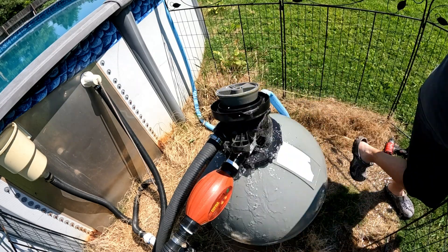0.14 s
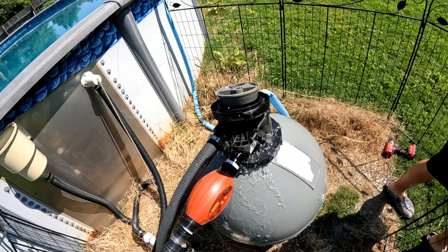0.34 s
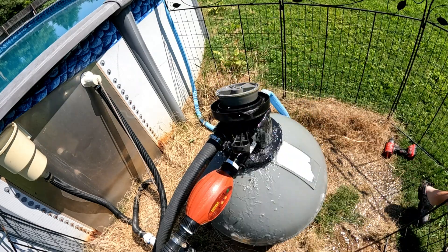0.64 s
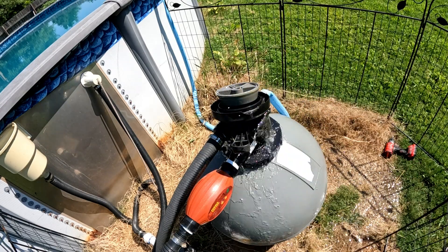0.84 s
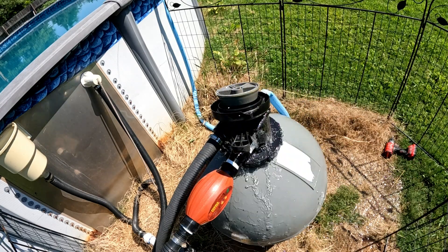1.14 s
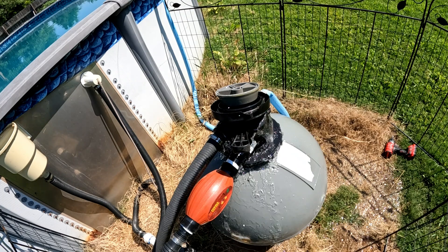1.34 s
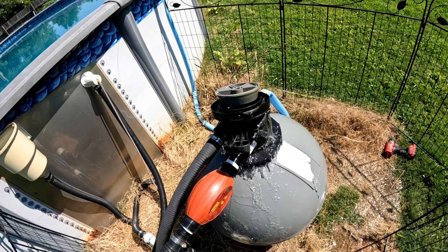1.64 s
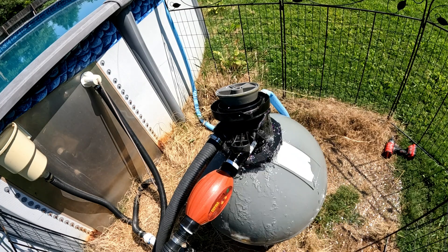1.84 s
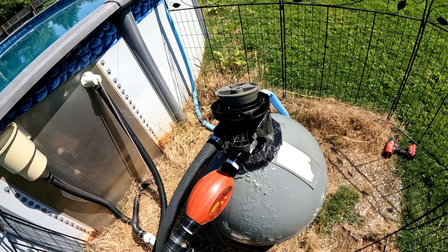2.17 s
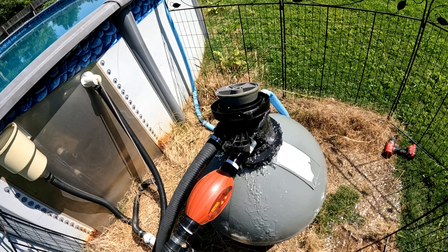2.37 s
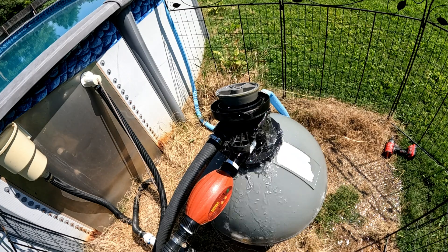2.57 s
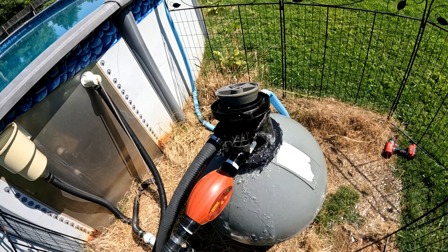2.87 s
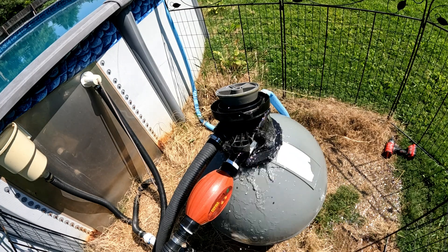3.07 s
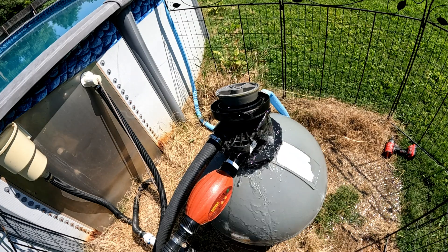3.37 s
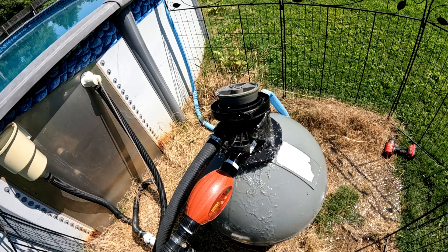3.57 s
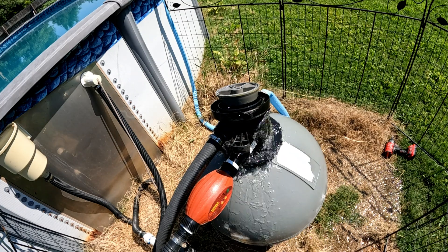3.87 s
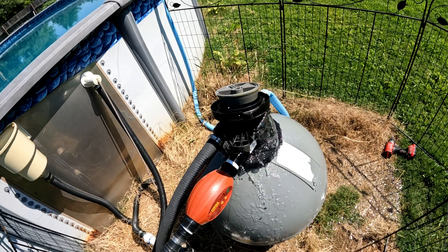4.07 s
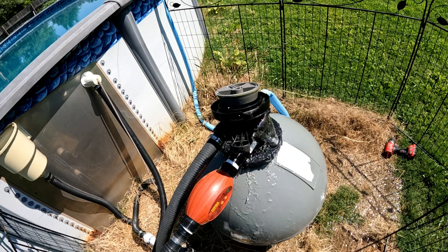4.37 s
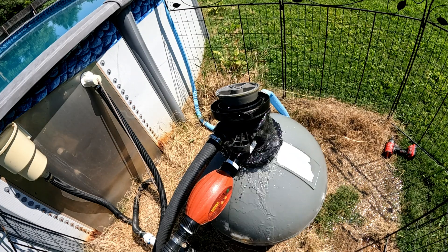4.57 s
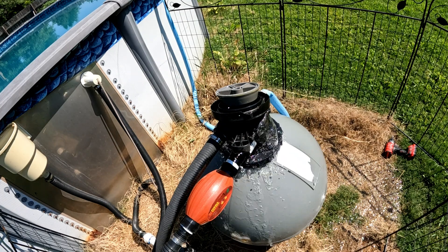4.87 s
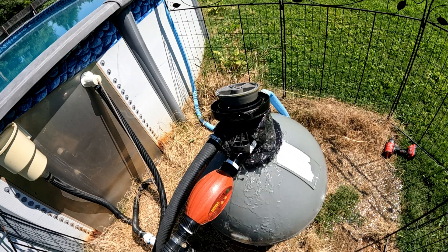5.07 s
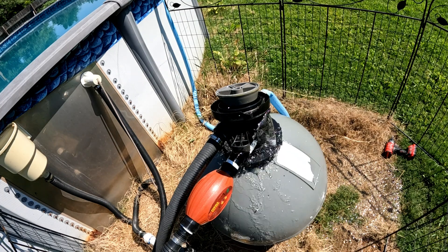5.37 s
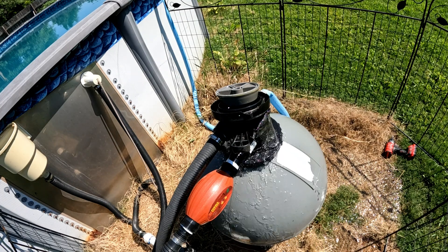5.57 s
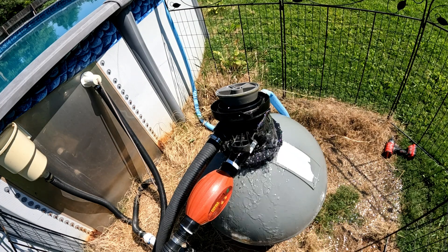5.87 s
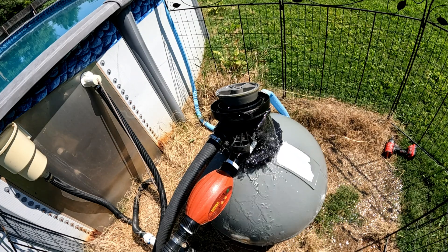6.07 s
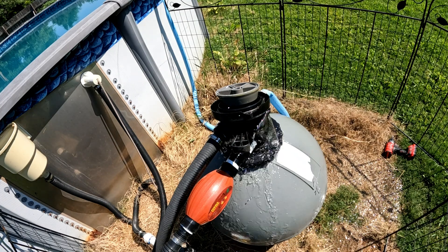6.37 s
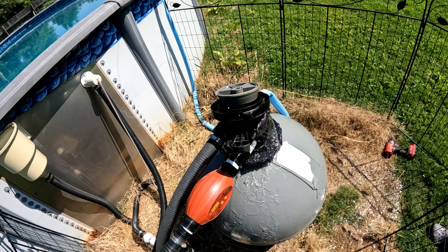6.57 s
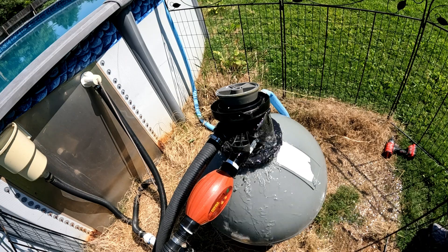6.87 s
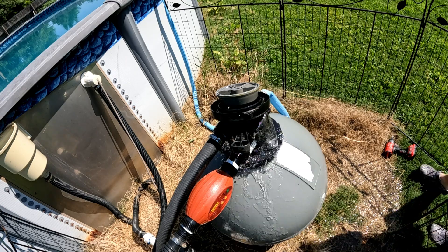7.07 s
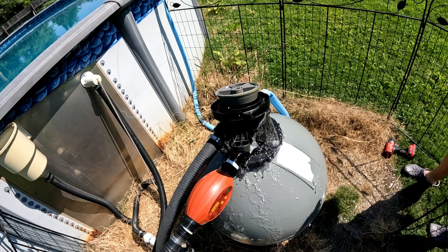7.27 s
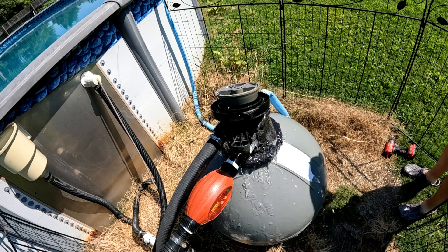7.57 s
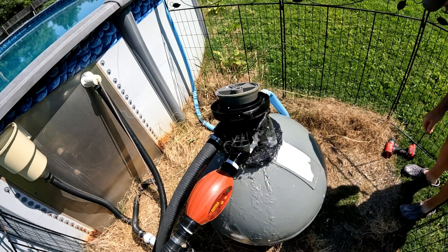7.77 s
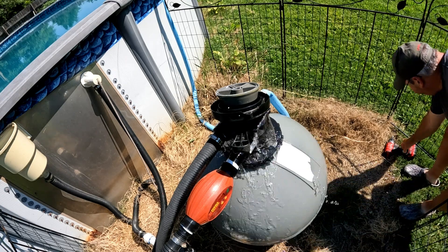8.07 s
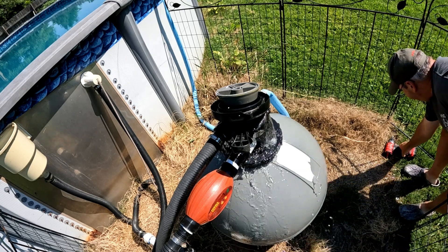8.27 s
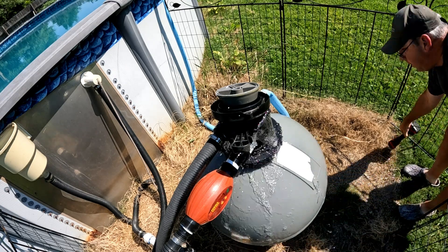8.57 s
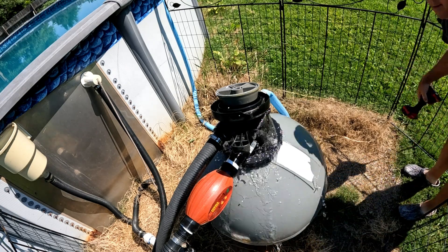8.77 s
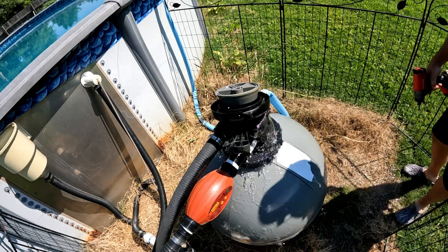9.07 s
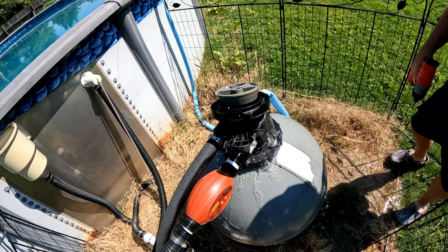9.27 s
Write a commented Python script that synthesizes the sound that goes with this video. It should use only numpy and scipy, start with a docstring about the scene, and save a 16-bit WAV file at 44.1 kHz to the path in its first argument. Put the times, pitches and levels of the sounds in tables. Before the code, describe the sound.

Bright bubbling trickle and ticking drops running off a pool tank, with a few brief wet squeaks and low wind buffets.

```python
"""Throughout, water wells out of the open valve of a pool filter, runs down the tank and splashes on the ground:
spurting swarms of ringing bubbles and ticking drops, over noise, outdoors in a light breeze with a far rush.
Faint hum swells in and out until 5.9 s; wet gliding squeaks stand out at 0.7, 1.4 and 2.3-2.6 s.
Gusts of rumbling noise buffet the microphone hard with single thuds at 2.3-2.9 s and 3.8-4.3 s.
The valve's hollow rings, as a resonance of the stream, from 4.6 to 7.5 s; soft footfalls of noise at 7.2-7.8 s."""
import sys
import numpy as np
from scipy import signal
from scipy.fft import rfft, irfft, next_fast_len
from scipy.io import wavfile
from scipy.ndimage import uniform_filter1d

SR = 44100
rng = np.random.default_rng(int(sys.argv[2]) if len(sys.argv) > 2 else 0)


def transcribe(signal):
    """Save signal, clipped to [-1, 1], as a 16-bit WAV file at the path in sys.argv[1]."""
    frames = np.atleast_2d(signal).T
    limited = np.clip(frames, -1, 1)
    pcm = np.round(limited * 32767).astype(np.int16)
    wavfile.write(sys.argv[1], SR, pcm)


N = 415863
T = np.arange(N) / SR


def amp(db):
    """Decibels to gain."""
    return 10 ** (np.asarray(db) / 20)


def unit(x):
    """Scales to an rms of one."""
    return x / np.sqrt(np.mean(x ** 2) + 1e-20)


def read(points, hz):
    """Reads a spectrum on a log-frequency axis."""
    f, value = np.transpose(points)
    return np.interp(np.log(hz + 1), np.log(f), value)


def curve(rows):
    """Interpolates a table of (t/s, level/dB) at every sample."""
    t, level_db = np.transpose(rows)
    return np.interp(T, t, level_db)


def colour(x, points):
    """Multiplies a sound's spectrum by a curve, then scales to an rms of one."""
    size = next_fast_len(N + 4096)
    gain = amp(read(points, np.fft.rfftfreq(size, 1 / SR)))
    return unit(irfft(rfft(x, size) * gain, size)[..., :N])


def add(mix, s, sound):
    """Adds a sound into the mix at a time."""
    part = mix[..., max(round(s * SR), 0):][..., :sound.shape[-1]]
    part += sound[..., :part.shape[-1]]


def wander(per_s):
    """A random curve that takes per_s new values a second."""
    knots = rng.standard_normal(4096)
    return unit(np.interp(T * per_s, np.arange(len(knots)), knots))


def pair(likeness):
    """Two white noises that are partly alike."""
    a, b = rng.standard_normal((2, N))
    c = np.clip(likeness, 0, 1)
    return np.array([a, c * a + np.sqrt(1 - c * c) * b])


def swells(rows):
    """Soft-edged bursts of gain from rows of (t/s, length/s, level/dB)."""
    level = np.zeros(N)
    for s, length_s, db in rows:
        add(level, s, amp(db) * np.hanning(int(length_s * SR)))
    return level


# relative spectra of gurgle and spatter: f/Hz, level/dB
GURGLE_COLOUR = [(300, -20), (600, -13), (830, -6.5), (1100, 0.5), (1450, -0.5), (1660, 2), (1900, -2),
                 (2400, 2.5), (3500, -18)]
SPATTER_COLOUR = [(600, -20), (1500, -0.5), (2300, -4), (2950, 2), (3500, -1.5), (5000, -5), (6500, -7),
                  (7700, -12), (8800, -20), (9900, -14), (12500, -25), (14500, -53), (15800, -81)]


def stream(gurgle_db=-5, spatter_db=-1):
    """The overflow arrives in quick, uneven spurts that drive gurgle, spatter and a fine wash together."""
    spurt_db = 0.85 * spurts(per_s=30) + 0.7 * spurts(per_s=140)
    churn_db = 1.3 * spurts(per_s=45)  # trapped air leaves the valve in clumps
    gurgle = swarm(2 * (spurt_db + churn_db), per_s=1150, low_hz=370.6, high_hz=3407, cycles=5.1,
                   spread_db=2.0, width=0.45, size_limit=3.6, top_rise=0.09)
    gurgle = colour(gurgle + amp(-2.0) * pair(1.0), GURGLE_COLOUR)

    spatter = swarm(spurt_db, per_s=2100, low_hz=1501, high_hz=14070, cycles=5.34,
                    spread_db=2.5, width=0.49, size_limit=3.8, top_rise=0.047)
    spatter += amp(0.5) * impacts(spurt_db, per_s=420, spread_db=2.5, ring_s=0.0012)
    spatter += amp(-2.5) * pair(0.94)
    # the finest spray reaches each port on its own
    spray = colour(pair(0), [(4000, -15), (11500, -3), (13500, -4.5), (15500, -42)])
    spatter = colour(spatter, SPATTER_COLOUR) + amp(-21.5) * spray
    spatter = unit(spatter * amp(1.28 * spurt_db + 0.6 * wander(per_s=16)))

    water = amp(gurgle_db) * unit(gurgle) + amp(spatter_db) * spatter
    return water * amp(flow_db())


# the stream eases a little: t/s, level/dB
STRENGTH = [(0, -38), (3.1, -39.5), (5.4, -40), (7.9, -39.5), (9.4, -39.5)]
# surges and lulls of water over the rim: t/s (middle), level/dB (re stream)
SURGES = [(1.04, -3), (1.2, 2), (2.09, 0.5), (3.46, -2), (3.56, 2), (4.645, 3), (4.81, 1.7), (4.96, -1),
          (6.13, 1), (6.33, 2.5), (7.56, 3), (8.25, 4), (8.79, 0.5)]
SURGE_S = 0.049  # half width, to 1/e of the dB change


def flow_db():
    """Level of the stream: nearly steady, with short rounded surges and lulls."""
    surge_db = sum(db * np.exp(-((T - s) / SURGE_S) ** 2) for s, db in SURGES)
    return curve(STRENGTH) + surge_db


def spurts(per_s):
    """Quick random ups and downs that cancel out, so that the mean level in dB holds."""
    knots = np.diff(rng.random(4096) ** 2)
    return unit(np.interp(T * per_s, np.arange(len(knots)), knots))


def swarm(spurt_db, per_s, low_hz, high_hz, cycles, spread_db, width, size_limit, top_rise,
          link_s=0.0045, step=0.2, count=3):
    """Air breaks into short chains of bubbles, each soon after the last and near its pitch, thicker in spurts."""
    odds = np.cumsum(amp(spurt_db))
    out = np.zeros((2, N))
    chains = int(per_s * N / SR / count)
    for chain in rng.random((8000, count + 1, 5))[:chains]:
        when, pitch, size, side, _ = chain[0]
        s = np.searchsorted(odds, when * odds[-1]) / SR
        hz = low_hz * (high_hz / low_hz) ** pitch
        gain = amp(spread_db * min(-np.log(1 - size), size_limit)) * hz  # pitch weight keeps the swarm white
        pan = width * (2 * side - 1)
        for share, ring, glide, wait, leap in chain[1:]:
            ring_cycles = cycles * 2 ** (2 * ring - 1)
            sound = gain * share * bubble(hz, ring_cycles, rise=top_rise * glide ** 2)
            add(out, s, np.array([[1 + pan], [1 - pan]]) * sound)
            s += 2 * link_s * wait
            hz = min(hz * (1 + step * (2 * leap - 1)), high_hz)
    return unit(out)


def bubble(hz, cycles, rise):
    """A pocket of air swells into ringing and dies, its pitch rising as it nears the surface; envelope peak 1."""
    u = np.arange(int(4 * cycles * SR / hz)) * hz / (cycles * SR)  # time in ring lengths
    envelope = 2 * u * np.exp(1 - 2 * u)
    turns = cycles * (u + rise * (u * u / 2 - u * np.log(2)))
    return envelope * np.sin(2 * np.pi * turns)


def impacts(spurt_db, per_s, spread_db, ring_s, width=0.25):
    """Droplets tick on the tank and the ground, each a short dying burst of noise."""
    sizes = amp(spread_db * np.minimum(rng.exponential(1, N), 5))
    hits = sizes * (rng.random(N) < per_s * amp(spurt_db) / SR)
    spot = rng.integers(0, 2048, N)
    t = T[:256]
    rings = rng.standard_normal((2048, 2, len(t))) * np.exp(-t / ring_s)
    out = np.zeros((2, N))
    for at in np.flatnonzero(hits):
        common, apart = rings[spot[at]]
        add(out, at / SR, hits[at] * (common + np.array([[width], [-width]]) * apart))
    return unit(np.diff(out, prepend=0) + .5 * out)  # treble lift


# loudest bubbles, deep glugs to high plinks: t/s, level/dB (peak), f/Hz, ring/cycles
BUBBLES = [(0.055, -21.5, 4030, 7.5), (0.2117, -19, 3680, 2.6), (0.543, -28.5, 4260, 8.1),
           (0.651, -35.5, 527, 4), (0.671, -23.5, 3670, 6.3), (1.129, -19, 3170, 7.2),
           (1.159, -18, 2350, 6.2), (1.2032, -22, 5700, 6.8), (1.5291, -21.5, 6600, 4.9),
           (1.566, -28.5, 1430, 5), (1.579, -19.5, 2060, 3.2), (1.657, -22.5, 2820, 4.5),
           (1.766, -39, 766, 2.5), (2.045, -28.5, 1570, 5.6), (2.094, -21.5, 3780, 7.3),
           (2.16, -40.5, 700, 7), (2.304, -25.5, 2560, 5.6), (2.6284, -20.5, 3150, 6),
           (2.782, -26, 2700, 8.7), (2.946, -27.5, 4600, 9.7), (2.967, -24.5, 4600, 8.3),
           (3.266, -22, 2480, 4), (3.4014, -22, 2260, 3.9), (3.5306, -20, 1870, 3),
           (3.8404, -21.5, 2270, 2.1), (3.842, -26.5, 7400, 9), (4.2664, -11.5, 5830, 3),
           (4.2651, -20, 2990, 6.2), (4.586, -21, 5760, 6.7), (4.6038, -21, 2900, 4.8),
           (4.765, -28, 3190, 7), (4.941, -34.5, 1610, 8), (5.029, -39, 1580, 17), (5.077, -32, 1480, 6),
           (5.194, -22.5, 3120, 3), (5.649, -23, 1940, 2.7), (5.684, -23, 2860, 3.3),
           (6.103, -30, 1700, 4.5), (6.1198, -22, 2300, 3.4), (6.161, -30, 1370, 4.6),
           (6.233, -24, 3270, 3.6), (6.318, -19, 3360, 1.9), (6.566, -22.5, 2860, 4.6),
           (6.66, -39, 750, 4.2), (6.8092, -21.5, 2940, 4.1), (7.148, -26, 2160, 4.8),
           (7.311, -19, 3000, 2.4), (7.739, -19, 2780, 1.1), (7.807, -31, 1810, 15),
           (7.8702, -16.5, 2720, 1.5), (7.92, -21, 4330, 5.9), (7.949, -28.5, 1660, 12),
           (8.127, -23.5, 2790, 8.5), (8.208, -22.5, 6060, 3.8), (8.244, -27, 1540, 3),
           (8.3797, -27, 3900, 15), (9.0257, -20, 1570, 2.3)]
# dull slaps, splats and cracks: t/s, level/dB (peak), f/Hz (mid band), decay/s
SPLATS = [(1.283, -31, 520, 0.0065), (1.295, -26.5, 800, 0.01), (1.317, -29, 600, 0.006),
          (1.361, -17.5, 2400, 0.0026), (2.07, -31, 1310, 0.004), (2.65, -22, 900, 0.0053),
          (2.813, -27.5, 2000, 0.0031), (4.077, -33, 696, 0.022)]
# drops ticking sharply on the tank: t/s, level/dB (peak), f/Hz (mid band)
TICKS = [(0.134, -22, 5200), (0.474, -29, 6200), (0.627, -19.5, 9500), (2.427, -20.5, 3700),
         (2.8, -29.5, 6700), (3.519, -20, 3600), (4.266, -20, 6000), (4.848, -30, 4300),
         (5.225, -25.5, 5500), (5.37, -19.5, 6400), (5.884, -20, 10500), (6.351, -25, 6000),
         (6.531, -20, 3500), (7.735, -19.5, 4000), (8.975, -31.5, 6300), (9.376, -20, 3900)]
TICK_DECAY_S = 0.0024


def plinks():
    """The large bubbles, slaps and ticks that stand out from the stream."""
    out = np.zeros(N)
    for s, db, hz, cycles in BUBBLES:
        add(out, s, amp(db) * bubble(hz, cycles, rise=0.048))
    for s, db, hz, decay_s in SPLATS:
        add(out, s, amp(db) * slap(hz, decay_s))
    for s, db, hz in TICKS:
        add(out, s, amp(db) * slap(hz, TICK_DECAY_S))
    return out


def slap(hz, decay_s):
    """A short hit: a quickly dying patter of fine pulses, with a peak of one."""
    t = T[:2048]
    patter = rng.standard_normal(len(t)) * np.sqrt(rng.exponential(1, len(t)))
    edges_hz = [hz / 2.1, min(hz * 1.54, SR / 2 - 1)]
    band = signal.butter(2, edges_hz, "band", fs=SR, output="sos")
    sound = signal.sosfilt(band, patter * np.exp(-t / decay_s))
    sound = uniform_filter1d(sound, size=3)  # water cushions the very top
    return sound / abs(sound).max()


# upward-sweeping bubble: t/s, length/s, level/dB (start), f/Hz (start), rise/share of f
CHIRPS = [(4.747, 0.032, -38.5, 744, 1.12)]


def chirps(attack_s=0.0018, fade_db=-5):
    """A bubble nearly holds its pitch, then sweeps upward as it breaks the surface."""
    out = np.zeros(N)
    for s, length_s, db, hz, rise in CHIRPS:
        u = np.linspace(0, 1, int(length_s * SR))
        edges = np.minimum(np.minimum(u, 1 - u) * length_s / attack_s, 1)
        phase = 2 * np.pi * np.cumsum(hz * (1 + rise * u ** 3)) / SR
        add(out, s, edges * amp(db + fade_db * u) * np.sin(phase))
    return out


# hollow of the valve rings: t/s, length/s, level/dB (resonance gain at the crest)
HOLLOW = [(4.64, 2.9, -14)]


def hollow(water, ring_hz=1640, width_hz=130):
    """The water sets the hollow of the open valve ringing for a while: a resonant filter on the stream."""
    peak = signal.iirpeak(ring_hz, ring_hz / width_hz, fs=SR)
    return water + swells(HOLLOW) * signal.lfilter(*peak, water)


# wet squeaks: t/s, length/s, level/dB (fundamental), f/Hz (middle), rise/share of f, overtones/dB
SQUEAKS = [(0.721, 0.02, -18, 1077, 0.32, -10.5), (0.734, 0.028, -21, 1078, -0.1, -28),
           (1.384, 0.0097, -19, 978, -0.036, -7), (2.349, 0.048, -32.5, 957, -0.094, -4.5),
           (2.382, 0.04, -41, 882, -0.155, 0), (2.428, 0.029, -35, 890, 0.079, 3),
           (2.534, 0.018, -21.5, 884, 0.21, -3.5)]


def squeaks(arch=0.414, third_db=-9, rough=0.33):
    """Short slips of something wet: the pitch glides in an arch, with two overtones that tremble."""
    out = np.zeros(N)
    for s, length_s, db, hz, rise, overtone_db in SQUEAKS:
        u = np.linspace(-.5, .5, int(length_s * SR))
        tremble = wander(per_s=300)[:len(u)]
        phase = 2 * np.pi * np.cumsum(hz * (1 + rise * u - arch * u * u)) / SR
        overtones = np.sin(2 * phase) + amp(third_db) * np.sin(3 * phase)  # third re second
        tone = np.sin(phase) + amp(overtone_db) * overtones * (1 + rough * tremble)
        add(out, s, amp(db) * tone * np.cos(np.pi * u) ** 2)
    return out


# chafing under the run of squeaks: t/s, length/s, level/dB
RUB = [(2.32, 0.29, -43.5)]


def rubbing():
    """The wet surface goes on chafing between its squeaks: noise with broad peaks, one near their pitch."""
    chafe = colour(pair(0.94), [(150, -16), (370, 9), (650, -7.5), (930, 0), (1200, -9), (1780, -16),
                                (2200, -17), (2750, -9), (8000, -54)])
    return swells(RUB) * chafe


# soft footfalls on wet grass: t/s, length/s, level/dB
STEPS = [(7.205, 0.079, -38.5), (7.60, 0.058, -41.5), (7.69, 0.085, -42.5)]


def footsteps():
    """Soles press into the wet grass with a dull squelch: swells of coloured noise."""
    squelch = colour(pair(0.95), [(100, -6), (350, -11.0), (1050, -1), (2000, -8), (15000, -48)])
    return swells(STEPS) * squelch


def pool_wall(x, wet_db=-14, t60_s=0.0097):
    """The pool wall, tank and ground scatter a weak echo: sparse random taps, dying away."""
    t = T[:6000]
    taps = rng.standard_normal((2, len(t))) * (rng.random((2, len(t))) < .06)
    taps *= amp(-60 * t / t60_s) * (t > .003)
    taps /= np.linalg.norm(taps, axis=1, keepdims=True)
    return x + amp(wet_db) * signal.oaconvolve(np.atleast_2d(x), taps, axes=1)[:, :N]


# relative spectrum of the wind: f/Hz, level/dB
RUMBLE_COLOUR = [(10, -7), (33, 4), (50, -1.5), (70, -7.5), (120, -20), (200, -63), (400, -46), (3000, -97)]


def wind(lean_db=3.0):
    """Turbulence rumbles at the ports, most on the right; a strong gust adds smaller eddies and single thuds."""
    flutter_db = wind_db(flutter=True)
    rumble = colour(pair(0.97), RUMBLE_COLOUR)
    # level out slow swings, so that the wind speed sets the swell
    rumble /= np.sqrt(uniform_filter1d((rumble ** 2).mean(0), size=5000) + 0.017)
    flutter = colour(pair(0.49), [(40, -25), (110, 15.0), (220, 0.0), (400, -18.0), (2500, -68)])
    out = amp(wind_db() + 4.5) * rumble
    out = out + amp(flutter_db - 15.0 + 4.7 * wander(per_s=43)) * flutter
    out = out + thuds(flutter_db)
    return out * amp([[-lean_db], [lean_db]])


# gusts: t/s (start), length/s, level/dB (crest, before wind() offsets), flutter/dB (re level)
GUSTS = [(0.508, 0.52, -44.5, 3.5), (1.244, 0.21, -37.5, -14), (2.33, 0.36, -33, 7), (2.754, 0.063, -29, 6),
         (2.987, 0.095, -38, 4), (3.802, 0.12, -30.5, 2), (3.992, 0.28, -33.5, 10.5), (4.356, 0.12, -39, 4),
         (5.416, 0.13, -36, -18), (5.875, 0.056, -40, 0.5), (6.417, 0.03, -36.5, 6.5),
         (6.593, 0.1, -39.5, -3), (6.902, 0.022, -36, -15), (7.07, 0.091, -41, -18),
         (8.063, 0.42, -41.5, 5), (8.893, 0.18, -37.5, -1)]
GUST_RISE_S, GUST_BUILD_DB, GUST_FALL_S = 0.11, 5.5, 0.068  # arrives, builds to its crest, drops away
BREEZE_DB, BREEZE_FLUTTER_DB = -50.5, 1  # air between gusts, before wind() offsets
FLUTTER_STEEPNESS = 1.46  # smaller eddies follow a gust's shape this many times more steeply


def wind_db(flutter=False):
    """Level of the wind, or of its flutter: gusts of one shape over a light breeze."""
    power = np.full(N, amp(BREEZE_DB + flutter * BREEZE_FLUTTER_DB) ** 2)
    for s, length_s, db, flutter_db in GUSTS:
        early_s, late_s = np.maximum(s - T, 0), np.maximum(T - s - length_s, 0)
        build_db = GUST_BUILD_DB * (np.clip((T - s) / length_s, 0, 1) - 1)
        shape = amp(build_db) * np.exp(-early_s / GUST_RISE_S - late_s / GUST_FALL_S) + 1e-9
        if flutter:
            gust = amp(db + flutter_db) * shape ** FLUTTER_STEEPNESS
        else:
            gust = amp(db) * shape
        power = power + gust ** 2
    return 10 * np.log10(power)


# hardest eddies striking the microphone: t/s (middle), level/dB (before lean and envelope), f/Hz
EDDIES = [(2.307, -19, 50.5), (2.398, -23, 80), (2.458, -23.5, 125), (2.499, -19, 135), (2.514, -19.5, 205),
          (2.528, -16.5, 114), (2.586, -27, 210), (2.605, -16, 87), (2.638, -15.5, 36.3), (2.653, -17, 450),
          (2.679, -14.5, 119), (2.776, -18.5, 95), (2.79, -23, 135), (2.845, -13, 52), (3.839, -21, 45),
          (3.863, -25, 80), (3.924, -22, 114), (3.938, -16.5, 80), (4.010, -23.5, 138), (4.038, -20, 225),
          (4.045, -23, 170), (4.089, -26, 155), (4.144, -17, 133), (4.184, -24.5, 157), (4.215, -17.5, 128),
          (4.24, -20, 127), (4.266, -13.5, 117), (5.497, -26.5, 84), (6.446, -20, 64.5)]


def thuds(flutter_db, per_s=32, small_db=-8, spread_db=4, low_hz=130, high_hz=300):
    """Eddies strike the port with a push and pull each: the hardest, and small ones that follow the flutter."""
    when, pitch, size = rng.random((1200, 3))[:int(per_s * N / SR)].T
    at = (when * N).astype(int)
    level_db = flutter_db[at] + small_db - spread_db * (size + pitch)
    small = zip(T[at], level_db, low_hz * (high_hz / low_hz) ** pitch)
    t = T[:3000] - T[1500]
    out = np.zeros(N)
    for s, db, hz in EDDIES + list(small):
        add(out, s + t[0], amp(db) * np.sin(2 * np.pi * hz * t) / np.cosh(t * hz / 0.28))
    return out


# swells of a faint hollow hum: t/s, length/s, level/dB
HUMS = [(.13, 0.22, -49.5), (.44, 0.23, -47.5), (.86, 0.25, -52.5), (2.92, 0.19, -51), (4.3, 0.17, -48.5),
        (5.78, 0.11, -49.5)]
HUM_HZ = 204.6


def hum(waver_hz=4):
    """A faint hollow hum comes and goes: a sine of wavering pitch."""
    hz = HUM_HZ + waver_hz * wander(per_s=61)
    return swells(HUMS) * np.sin(2 * np.pi * np.cumsum(hz) / SR)


# relative spectrum of the yard: f/Hz, level/dB
YARD_COLOUR = [(40, -4), (120, -8), (200, -9.5), (3000, -64)]


def yard():
    """The low, steady background of the yard: coloured noise."""
    return amp(-62.0) * colour(pair(0.74), YARD_COLOUR)


# distant low rush behind the water: t/s, level/dB
DISTANCE = [(0, -62), (3.6, -68), (4.7, -56), (6.1, -61.5), (6.8, -55), (7.85, -56), (8.05, -65.5),
            (9.4, -58.5)]


def distant_rush():
    """A low rush swells far off: coloured noise with a drifting, unsteady level."""
    noise = colour(pair(0.88), [(100, 2.5), (300, 5.5), (700, 2.5), (2000, -36)])
    return amp(curve(DISTANCE) + 3.2 * wander(per_s=9)) * noise


def scene():
    """Water and steps near the pool wall, wind, hum, the low background of the yard and a far rush."""
    slips = pool_wall(squeaks(), wet_db=-9.0, t60_s=0.11) + rubbing()
    water = pool_wall(hollow(stream()) + plinks() + chirps() + footsteps())
    return water + slips + wind() + hum() + yard() + distant_rush()


# microphone pair: f/Hz, level/dB (left minus right)
BALANCE_DB = [(40, 2.5), (150, 1), (400, -0.5), (1300, -1), (4400, -0.5), (8100, 1.3), (15000, 2.5)]
EDGE_HZ = 15650


def record(dry, lag_s=.000022):
    """Two ports: the left lags slightly, less so in the treble; their balance varies with pitch; then a low-pass."""
    size = next_fast_len(N + 4096)
    hz = np.fft.rfftfreq(size, 1 / SR)
    lag = np.exp(-1j * np.pi * hz * lag_s / (1 + (hz / 6000) ** 4))  # half the lag on each port
    tilt = amp(read(BALANCE_DB, hz) / 2) * lag
    ports = irfft(rfft(dry, size) * np.array([tilt, 1 / tilt]), size)[:, :N]
    low_pass = signal.firwin(511, EDGE_HZ, window=("kaiser", 9), fs=SR)
    return signal.oaconvolve(ports, low_pass[None], "same")


dry = scene()
out = record(dry)
transcribe(out)
```